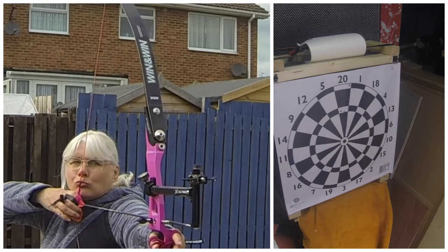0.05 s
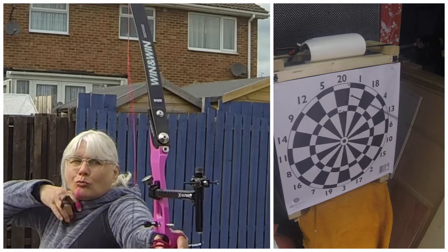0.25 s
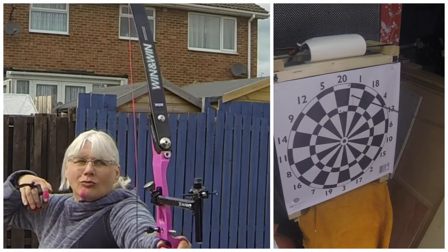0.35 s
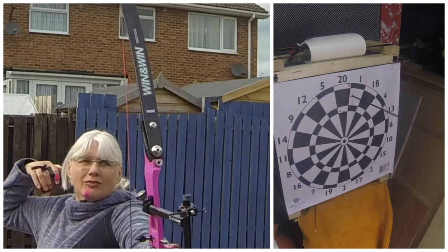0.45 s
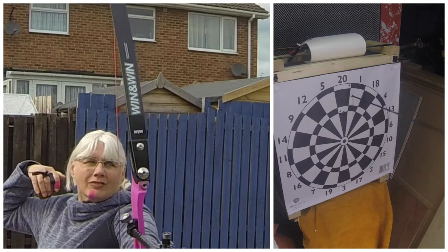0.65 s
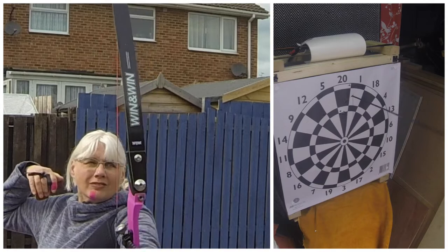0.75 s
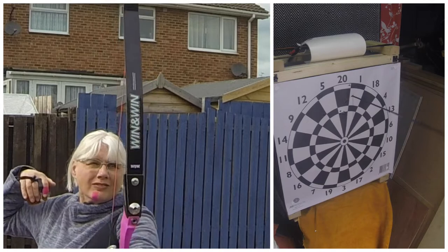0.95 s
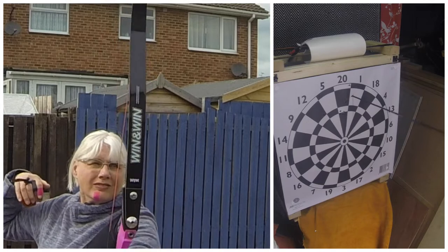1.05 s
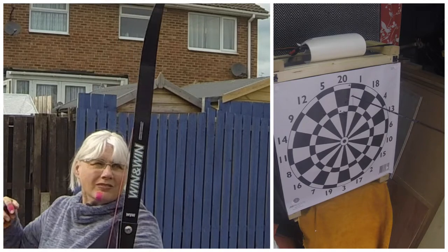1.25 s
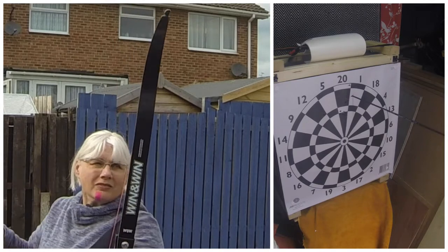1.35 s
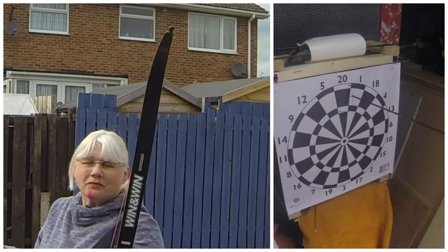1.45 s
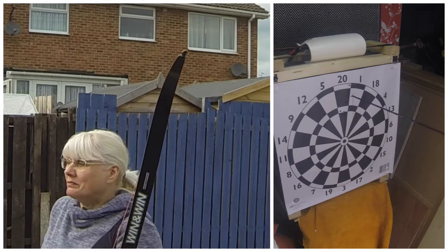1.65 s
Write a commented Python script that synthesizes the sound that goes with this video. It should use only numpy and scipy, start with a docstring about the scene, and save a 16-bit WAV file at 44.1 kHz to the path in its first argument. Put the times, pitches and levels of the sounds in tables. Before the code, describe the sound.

A bow is loosed with a brief swish and buzzing twang; a tenth of a second later the arrow cracks hard into a board beside the microphone, with a short clatter, wall echo and quiet garden air.

```python
"""A bowstring swishes off an archer's fingers, twangs and rattles the bow in a back garden.
A tenth of a second later the arrow cracks into a board close to the microphone, and a house wall echoes it.
Struck parts are decaying modes and filtered clicks; swish, buzz, clatter and breeze are shaped noise.
A limiter ducks just before the hit and slowly lets the breeze, a far drone and a bird back in.
Source levels are in dB re the limiter threshold, before envelopes; spectra are relative."""
import sys
import numpy as np
from scipy import signal
from scipy.fft import rfft, irfft
from scipy.io import wavfile
from scipy.ndimage import uniform_filter1d, minimum_filter1d

SR = 44100
rng = np.random.default_rng(int(sys.argv[2]) if len(sys.argv) > 2 else 0)


def master_out(mix):
    """Clip the mix to full scale and print it as 16-bit PCM to the path in sys.argv[1]."""
    frames = np.transpose(np.atleast_2d(mix))
    ceiling = np.clip(frames, -1, 1)
    pcm = np.round(ceiling * 32767).astype(np.int16)
    wavfile.write(sys.argv[1], SR, pcm)


N = 74970
T = np.arange(N) / SR
HZ = np.maximum(np.arange(N // 2 + 1) * SR / N, 1)
LOOSE_S, BRACE_S, HIT_S = .2025, .2135, .3096  # fingers open, string snaps straight, arrow lands


def undb(db):
    """Decibels to gain."""
    return 10 ** (np.asarray(db) / 20)


def colour(points):
    """Gain at every frequency, from (Hz, dB) points joined over log frequency."""
    hz, db = np.array(points, float).T
    return undb(np.interp(np.log(HZ), np.log(hz), db))


def band(hz, width_hz):
    """Causal response of one resonance, gain 1 at its centre."""
    return 1 / (1 + 1j * (HZ / hz - hz / HZ) * hz / width_hz)


def noise(gain):
    """Noise of rms 1 with the given response."""
    x = irfft(rfft(rng.standard_normal(N)) * gain, N)
    return x / x.std()


def walk(rate_hz):
    """Random wander with spread 1, low-passed at rate_hz."""
    return noise(1 / (1 + (HZ / rate_hz) ** 4))


def click(start_s, response):
    """One impulse through a response, peak 1."""
    delay = np.exp(-2j * np.pi * HZ * start_s)
    x = irfft(response * delay, N)
    return x / np.abs(x).max()


def burst(start_s, rise_s, t60_s):
    """Straight attack times an exponential decay."""
    age_s = np.maximum(T - start_s, 0)
    attack = np.minimum(age_s / rise_s, 1)
    return attack * np.exp(-np.log(1000) * age_s / t60_s)


def ring(start_s, hz, db, t60_s, rise_s):
    """One struck mode: a decaying sine."""
    return undb(db) * burst(start_s, rise_s, t60_s) * np.sin(2 * np.pi * hz * (T - start_s))


def arrow_hit():
    """The point cracks in, a bending wave chirps down the shaft, and the board rings and clatters."""
    # Board contacts. Each row: lag after landing in s, peak in dB, centre in Hz, width in Hz.
    contacts = [(0, 20.5, 2970, 1703), (.0002, -0.5, 500, 593), (.0008, 8.5, 1700, 380),
                (.0018, 4, 3220, 1603), (.0023, 11, 6000, 5000)]
    # Modes of board and arrow. Each row: frequency in Hz, level in dB, t60 in s.
    board_modes = [(42.24, -20.5, 0.3), (98.6, -25, 0.4), (176.6, -28, .33), (272, -7.5, 0.095),
                   (319.7, -3, 0.089), (367.5, -9.5, .11), (419, -8, 0.079), (579, -4, 0.092),
                   (614.7, -12.5, 0.09), (1580, -6.5, .09), (1672, -7.5, .085), (1868, -16, .07),
                   (2220, -11.5, 0.033), (2580, -10.5, .065), (2715, -5.5, 0.05), (2898, -11, .07),
                   (3110, -13, 0.12)]
    # Shaft spectrum. Each row: frequency in Hz, level in dB.
    shaft_spectrum = [(100, -22.5), (350, 6), (600, 6.5), (900, -9.5), (1300, -6), (2000, -0.5), (3400, 1),
                      (4500, -11), (9000, -27.5)]
    # Spectrum of the board and things around it. Each row: frequency in Hz, level in dB.
    clatter_spectrum = [(80, -6), (300, 2), (600, 1), (850, -6), (1300, -10.5), (1650, 0), (3300, -2),
                        (4500, -11.5), (7000, -18.5), (11000, -24.5), (13000, -37), (15000, -41.5)]
    # Loose things rattling. Each row: start in s, level in dB, centre in Hz.
    rattle_hits = [(.3268, -15, 2910), (0.3327, -23, 2600), (0.349, -33, 3200), (0.372, -41, 5720),
                   (0.382, -27, 1940)]
    shaft_lag_s, shaft_db = .0086, 5.5  # lag at 1 kHz
    board_lag_s = .007  # lag at 500 Hz
    clatter_db, clatter_t60_s, clatter_rough_db = 0.5, 0.096, 2

    soften = 1 / (1 + 1j * HZ / 9000)
    crack = sum(undb(db) * click(HIT_S + lag_s, band(hz, width_hz) ** 2 * soften)
                for lag_s, db, hz, width_hz in contacts)

    # Bending waves: delay goes as 1 / sqrt(frequency), so high notes arrive first.
    dispersion = np.exp(-4j * np.pi * shaft_lag_s * np.sqrt(1000 * HZ))
    shaft = undb(shaft_db) * click(HIT_S, colour(shaft_spectrum) * dispersion)
    board = sum(ring(HIT_S + board_lag_s * np.sqrt(500 / hz), hz, db, t60_s, rise_s=0.0013)
                for hz, db, t60_s in board_modes)

    clatter = undb(clatter_db) * burst(HIT_S, 0.003, clatter_t60_s) * noise(colour(clatter_spectrum))
    clatter = clatter * undb(clatter_rough_db * walk(300))
    rattles = sum(undb(db) * burst(start_s, rise_s=.0005, t60_s=0.015) * noise(band(hz, hz) ** 2)
                  for start_s, db, hz in rattle_hits)
    return crack + shaft + board + clatter + rattles


def bow():
    """The string slips off, swishes forward, snaps straight and shakes limbs and fittings; the hand damps them."""
    # String and limb modes. Each row: frequency in Hz, level in dB, t60 in s before hand damping.
    string_modes = [(43.87, -47, .5), (92.6, -38.5, .5), (131.2, -28.5, 0.71), (176.1, -28.5, 0.84),
                    (218.6, -30.5, 0.51), (269.8, -38.5, 0.46), (344.3, -35.5, 0.8), (537.6, -44.5, 0.54)]
    # Fitting modes. Each row: frequency in Hz, level in dB, t60 in s before hand damping.
    fitting_modes = [(1141, -43.5, 0.51), (2050, -41.5, .35), (2520, -42, 0.44), (3820, -42, 0.3),
                     (4420, -38.5, .3), (5260, -41.5, 0.66), (10200, -48.5, 0.66), (11200, -56.5, 0.48)]
    # Bow buzz spectrum. Each row: frequency in Hz, level in dB.
    buzz_spectrum = [(60, -11), (200, 6), (600, 1), (1000, -6.5), (2500, -10), (4000, -7.5), (5300, -4.5),
                     (6500, -14), (10500, -19), (12500, -24.5), (15000, -30.5)]
    # Swish spectrum. Each row: frequency in Hz, level in dB.
    swish_spectrum = [(100, -17), (600, -1.5), (1200, -5.5), (5000, -8), (10500, -11.5), (15000, -23.5)]
    # Clacks of string and fittings. Each row: start in s, level in dB, centre in Hz, t60 in s.
    clack_hits = [(.2222, -25, 3168, 0.059), (0.222, -25.5, 6506, 0.013), (0.2538, -32.5, 5300, 0.036)]
    slip_hz, slip_db, swish_db = 567, -35.5, -42
    buzz_db, buzz_rise_s, buzz_t60_s = -29.5, 0.019, 0.95
    buzz_pulsing, buzz_rough_db = 0.16, 2
    settle_s = .3  # hand damping begins
    string_settle_t60_s, rattle_settle_t60_s = 1.4, 0.24

    slip = ring(LOOSE_S, slip_hz, slip_db, t60_s=0.052, rise_s=0.0004)
    swish = undb(swish_db) * burst(LOOSE_S, rise_s=0.0039, t60_s=0.26) * noise(colour(swish_spectrum))
    twang = sum(ring(BRACE_S, hz, db, t60_s, rise_s=0.0009) for hz, db, t60_s in string_modes)
    metal = sum(ring(BRACE_S, hz, db, t60_s, rise_s=0.0057) * (1 + .4 * walk(60))
                for hz, db, t60_s in fitting_modes)

    pulse_hz = string_modes[1][0]  # buzz pulses at the second string mode
    pulsing = 1 + buzz_pulsing * np.cos(2 * np.pi * pulse_hz * (T - BRACE_S))
    roughness = undb(buzz_rough_db * walk(400))
    buzz = undb(buzz_db) * burst(BRACE_S, buzz_rise_s, buzz_t60_s) * noise(colour(buzz_spectrum))
    buzz = buzz * pulsing * roughness
    clacks = sum(undb(db) * burst(start_s, 0.00098, t60_s) * noise(band(hz, width_hz=3200) ** 2)
                 for start_s, db, hz, t60_s in clack_hits)

    damped_s = np.maximum(T - settle_s, 0)
    string_damping = np.exp(-np.log(1000) * damped_s / string_settle_t60_s)
    rattle_damping = np.exp(-np.log(1000) * damped_s / rattle_settle_t60_s)
    return slip + swish + twang * string_damping + (metal + buzz) * rattle_damping + clacks


def garden():
    """Fences scatter the hit into a short noise tail; a house wall returns a click and a bright smear."""
    # Tail spectrum. Each row: frequency in Hz, level in dB.
    tail_spectrum = [(60, 5.5), (200, 10), (600, 4.5), (1000, -8.5), (2000, -3), (4000, -12.5),
                     (8000, -24.5), (15000, -39)]
    # Wall echo spectrum. Each row: frequency in Hz, level in dB.
    echo_spectrum = [(300, -33), (1500, -9), (3000, -4.5), (5200, -2.5), (7500, -15), (11000, -28),
                     (15000, -35)]
    tail_db, tail_t60_s = -22, 0.39
    echo_lag_s, echo_db, echo_rise_s, echo_t60_s = .1555, -38.5, 0.0086, 0.11
    click_db, click_hz = -47.5, 6500

    tail = undb(tail_db) * burst(HIT_S, 0.015, tail_t60_s) * noise(colour(tail_spectrum))
    tail = tail * undb(1.5 * walk(50))
    back_s = HIT_S + echo_lag_s
    front = undb(click_db) * burst(back_s, rise_s=0.00058, t60_s=0.018)
    front = front * noise(band(click_hz, width_hz=5400) ** 2)
    echo = undb(echo_db) * burst(back_s, echo_rise_s, echo_t60_s) * noise(colour(echo_spectrum))
    return tail + front + echo


def bird():
    """Distant soft whistles: arched sines on curved glides, fluttering in pitch and level."""
    # Each row: start in s, length in s, start, middle and end pitch in Hz, level in dB.
    notes = [(.86, 0.17, 1432, 1470, 1478, -68), (0.977, 0.12, 1550, 1545, 1427, -64),
             (1.101, 0.192, 1436, 1523, 1535, -67), (1.365, 0.077, 1600, 1665, 1620, -65.5),
             (1.46, 0.068, 1570, 1570, 1580, -69.5), (1.519, .13, 1597, 1745, 1687, -62.5),
             (1.634, 0.11, 1640, 1637, 1680, -62.5)]
    out = np.zeros(N)
    for start_s, length_s, first_hz, middle_hz, last_hz, db in notes:
        u = np.clip((T - start_s) / length_s, 0, 1)
        glide = np.polyfit([0, .5, 1], [first_hz, middle_hz, last_hz], 2)
        hz = np.polyval(glide, u) * (1 + 0.0088 * walk(64.3))
        arch = np.sqrt(2 * np.abs(np.sin(np.pi * u)))
        out += undb(db + 3.2 * walk(50)) * arch * np.sin(2 * np.pi * np.cumsum(hz) / SR)
    return out


def background():
    """Outdoor hiss and wind rumble from noise, a wavering low sine drone and narrow-band whines."""
    # Air spectrum. Each row: frequency in Hz, level in dB.
    air_spectrum = [(25, -10), (40, -3.5), (86, -8), (125, -7.5), (186, -12), (264, -12), (673, -19.5),
                    (1000, -23), (1300, -24.5), (1630, -24), (3200, -29), (6000, -37), (10000, -45),
                    (15000, -53.5)]
    # Wind rumble. Each row: time in s, level in dB.
    rumble_levels = [(0, -51), (.06, -57), (.18, -62.5), (.85, -66.5), (.97, -57), (1.1, -71.5),
                     (1.56, -72), (1.62, -52), (1.7, -57.5)]
    # Far drone. Each row: time in s, pitch in Hz, level in dB.
    drone_track = [(0, 131.5, -58.5), (.11, 133.6, -59.5), (.18, 126.5, -67), (1.15, 121, -68.5),
                   (1.27, 122.1, -54), (1.462, 119.9, -58), (1.535, 121.5, -46.5), (1.6, 117.7, -65.5),
                   (1.68, 116.1, -55.5)]
    # Thin whines. Each row: centre in Hz, level in dB.
    whine_bands = [(1015, -73.5), (1895, -78.5), (3215, -74.5)]
    air_db, rumble_hz = -54, 57

    air = undb(air_db + .5 * walk(10)) * noise(colour(air_spectrum))
    rumble_db = np.interp(T, *np.array(rumble_levels).T)
    rumble = undb(rumble_db) * noise(band(rumble_hz, width_hz=85) ** 2)

    time_s, pitch_hz, level_db = np.array(drone_track).T
    drone_hz = np.interp(T, time_s, pitch_hz) * (1 + .015 * walk(25))
    drone_db = np.interp(T, time_s, level_db) + 1.5 * walk(20)
    phase = 2 * np.pi * np.cumsum(drone_hz) / SR
    drone = undb(drone_db) * np.sqrt(2) * np.sin(phase)  # level is rms
    whines = sum(undb(db) * noise(band(hz, width_hz=76) ** 2) for hz, db in whine_bands)
    return air + rumble + drone + whines


def scene():
    """Hit, bow, echoes, bird and background at one microphone."""
    return (arrow_hit() + bow() + garden() + bird() + background())[None]


def recover(cut_db, db_per_s):
    """A gain cut that falls back at a steady rate in dB."""
    return np.maximum.accumulate(cut_db + db_per_s * T) - db_per_s * T


def record(dry):
    """A look-ahead limiter with a quick and a slow, held recovery; then a steep low-pass."""
    lookahead_s, fast_db_per_s = .0165, 49
    slow_share, slow_hold_s, slow_db_per_s = 0.37, 0.42, 17.5  # share of the cut in dB
    top_hz = 15200

    over_db = 20 * np.log10(np.maximum(np.abs(dry[0]), 1))
    ahead, hold = int(lookahead_s * SR), int(slow_hold_s * SR)
    # Running maxima: the first looks forward, the second back.
    cut_db = -minimum_filter1d(-over_db, ahead, origin=-(ahead // 2), mode="constant")
    held_db = -minimum_filter1d(-cut_db, hold, origin=(hold - 1) // 2, mode="constant")
    fast_db = recover(cut_db, fast_db_per_s)
    slow_db = recover(slow_share * held_db, slow_db_per_s)
    gain = uniform_filter1d(undb(-np.maximum(fast_db, slow_db)), size=90)
    low_pass = signal.ellip(8, .2, 70, top_hz, fs=SR, output="sos")
    return signal.sosfilt(low_pass, dry * gain)


dry = scene()
out = record(dry)
master_out(out)
```